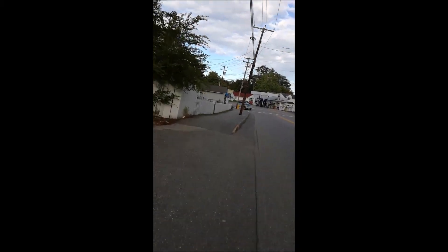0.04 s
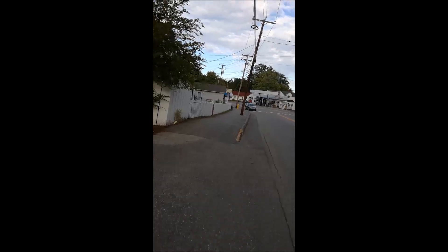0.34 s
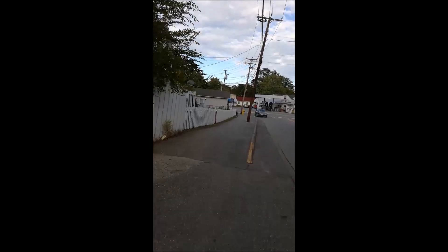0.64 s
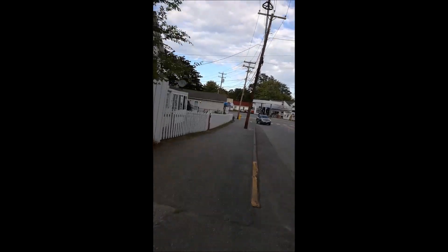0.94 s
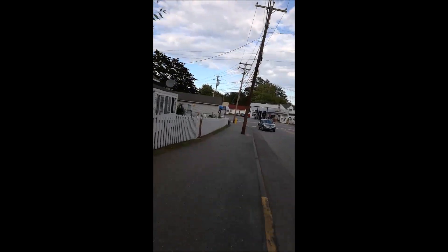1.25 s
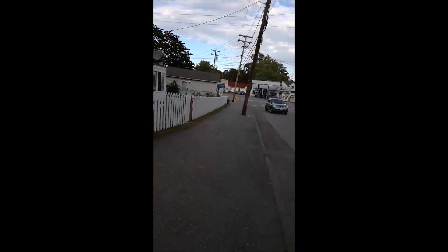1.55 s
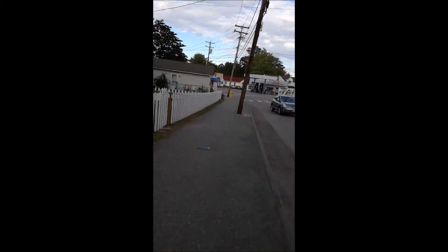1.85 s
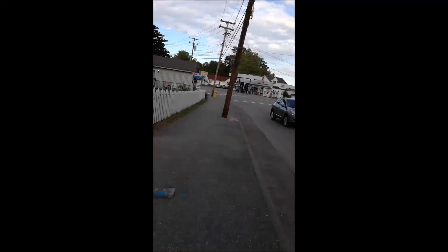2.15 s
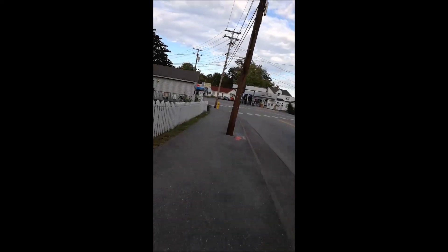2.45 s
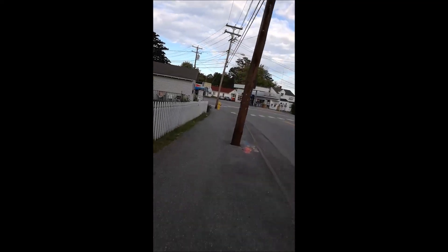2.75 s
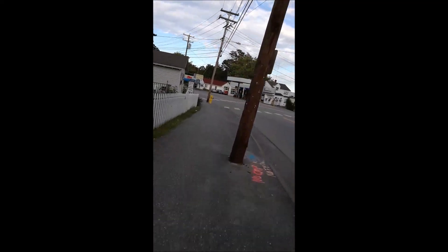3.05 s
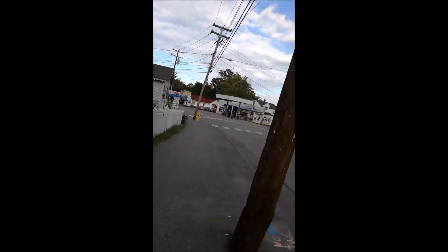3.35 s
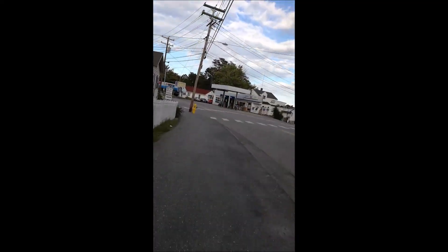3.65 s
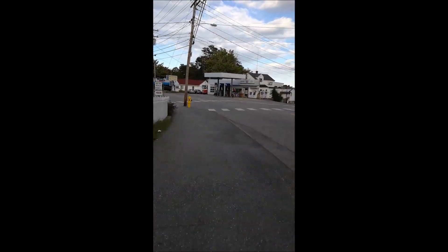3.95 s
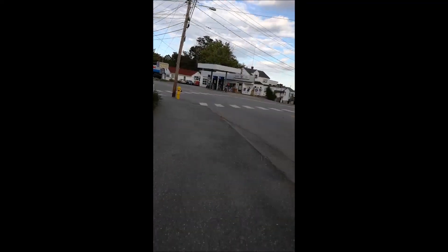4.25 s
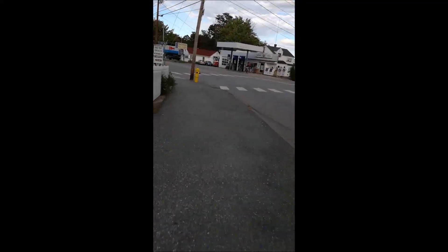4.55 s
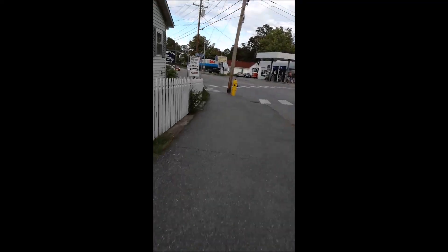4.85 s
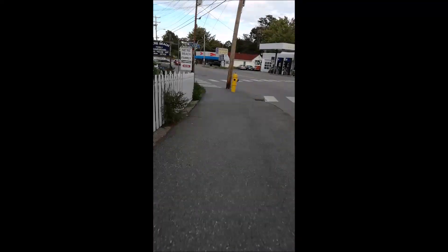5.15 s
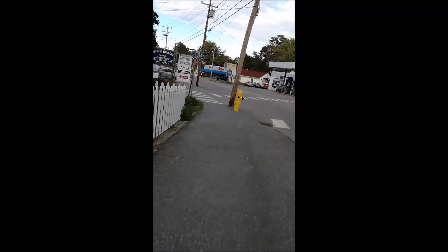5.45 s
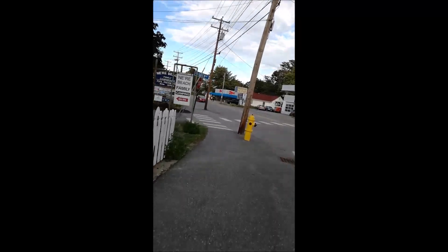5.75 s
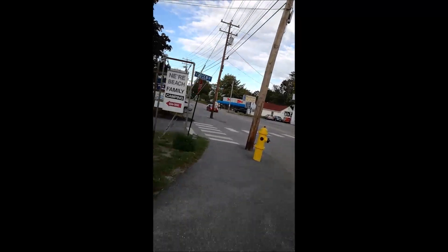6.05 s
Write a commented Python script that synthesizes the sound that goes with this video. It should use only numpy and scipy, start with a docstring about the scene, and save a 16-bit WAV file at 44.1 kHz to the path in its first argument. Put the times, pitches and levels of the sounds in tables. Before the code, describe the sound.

Heard from a moving skateboard on a roadside path, low wind rumble on the microphone sits under the grainy roar of wheels and a shaking deck. Pavement seams knock and tiny stones tick. A car's tyres rush by on the right, then the board slides briefly, scraping and chattering with a falling squeal. The wheels grip and keep rolling with a few more knocks as distant traffic grows faintly.

```python
"""An asphalt path, heard from a rolling skateboard. Grit drums on the wheels and shakes the deck;
the wheels thud over seams, crunch sand and flick small stones. A car passes on the right, then the
wheels slide sideways with a rasp and a falling stick-slip squeal. Wind rumbles at the two microphone
ports, and tyre noise from a junction ahead grows at the end."""
import sys
import numpy as np
from scipy import signal
from scipy.fft import rfft, irfft
from scipy.io import wavfile
from scipy.ndimage import uniform_filter1d

SR = 44100
rng = np.random.default_rng(int(sys.argv[2]) if len(sys.argv) > 2 else 0)


def store_pcm(level_fs):
    """Save levels as 16-bit WAV."""
    pcm = np.round(np.clip(level_fs, -1, 1) * 32767).astype(np.int16)
    wavfile.write(sys.argv[1], SR, np.atleast_2d(pcm).T)


N = 273420
TIME, HZ = np.arange(N) / SR, np.fft.rfftfreq(N, 1 / SR)
SLIDE_S, GRIP_S, ROLLING_S = 3.48, 4.137, 4.222  # wheels break loose, start to grip, roll again

# Rolling noise: time_s, level_db, tilt_db_per_oct, ring_db, hollow_db
ROLL_CURVE = [(0, -60, 1, -54, -57), (.3, -59, 1, -55.5, -55), (.53, -53, -1.5, -56, -64),
              (1, -56.5, -0.2, -57, -50), (1.45, -53, -1, -57, -51), (4.25, -52, -0.5, -58, -71),
              (4.47, -55.5, -1.5, -62, -67), (4.62, -52, -1, -61, -73), (5.5, -51, -1.9, -59, -58),
              (6.2, -50, -2, -71, -70)]
# Tread spectrum: freq_hz, density_db
TREAD_SPECTRUM = [(200, -9), (700, 2.5), (1300, -7.5), (2000, -4.5), (2900, -5.5), (3500, -11),
                  (5000, -11.5), (6300, -13.5), (8000, -18), (9500, -21.5), (11500, -25.5), (14500, -23.5),
                  (16000, -31)]
# Broad wheel resonances: freq_hz, width_hz, lift_db
WHEEL_RESONANCES = [(1650, 230, 5), (4380, 500, 4.5), (7200, 790, 3)]
# Board-to-port paths: freq_hz, coherence, left_lead_rad, left_over_right_db
BOARD_STEREO = [(700, 0.95, 1.44, 20), (1190, 0.41, 1.5, 0), (1800, 0.15, 4.5, 6), (2390, 0.92, 4.8, -5),
                (3240, 0.32, 7.95, -3), (4150, 0.24, 8.4, -2.5), (5400, 0.48, 13.2, -11.5),
                (7330, 0.52, 18, -7.5), (9060, .25, 22.3, -11), (10900, .15, 27.2, -2.5),
                (14100, .15, 19, 7)]

def wheels(ring_hz=2386, ring_rise_hz_per_s=30, hollow_hz=1666, wobble_db=0.95):
    """Asphalt grain drums on wheels and trucks: broad modes, and two that sing out."""
    level_db, tilt, ring_db, hollow_db = over_time(ROLL_CURVE)
    modes_db = sum(db / (1 + (2 * (HZ - hz) / width) ** 2) for hz, width, db in WHEEL_RESONANCES)
    grain = grit(per_s=2300, spread_db=2.5, hiss=1.46)
    roll = at_ports(grain, over_freq(TREAD_SPECTRUM)[0] + modes_db, BOARD_STEREO)
    ring = wheel_mode(ring_hz + ring_rise_hz_per_s * TIME, ring_db, width_hz=260, left_db=-2)
    hollow = wheel_mode(hollow_hz, hollow_db, width_hz=240, left_db=5)
    roll = tilted(roll, tilt, pivot_hz=2450) * gain(level_db)
    return (roll + ring + hollow) * gain(wobble_db * flutter(25))


def wheel_mode(hz, level_db, width_hz, left_db, wander=.02, swell_db=1.5):
    """A wheel mode drifts in pitch and strength with the load."""
    drift, strength = flutter(6), flutter(9)
    ring = resonance(hz * (1 + wander * drift), width_hz)
    return ring * gain(level_db + swell_db * strength) * pan(left_db)


# Rough patches, and dips as the wheels go light: centre_s, length_s, rumble_lift_db, roar_lift_db
SHAKE_CHANGES = [(0.258, 0.11, -8, -6), (0.367, 0.094, 5, 2.5), (0.961, 0.04, 8.5, 2.5),
                 (1.4, .04, -1, 4.5), (1.862, 0.082, 6.5, 3), (2.165, 0.18, 7, 3), (2.629, 0.038, 7.5, 2.5),
                 (2.791, 0.059, 10, 4), (3.278, 0.18, 8, 3), (3.484, 0.05, -7, -11), (3.578, 0.096, 8, 2.5),
                 (4.83, 0.078, -1.5, 1.5), (4.98, 0.073, 3, 4.5)]

def shake_lifts_db():
    """Rough patches swell the rumble and roar; both dip briefly when the wheels go light."""
    return sum(np.outer([low, high], swell(s, length)) for s, length, low, high in SHAKE_CHANGES)


# Asphalt coarseness: time_s, rumble_gain_db, roar_gain_db
SURFACE_CURVE = [(0, -26.5, -26), (.55, -24, -27), (.8, -28.5, -27.5), (1.25, -26.5, -27),
                 (1.6, -28, -29.5), (2, -30, -32), (2.7, -28.5, -28), (3.05, -29.5, -28.5),
                 (3.75, -32.5, -28.5), (4.15, -24, -25.5), (4.33, -28, -31.5), (4.55, -24, -29),
                 (4.83, -22, -26), (5.17, -25.5, -30), (5.4, -24, -26.5), (5.8, -29.5, -33.5),
                 (6.2, -31.5, -29.5)]
# Deck and wind spectrum: freq_hz, density_db
RUMBLE_SPECTRUM = [(15, -37), (30, -10), (60, -4), (90, 4.5), (150, 2.5), (250, -0.5), (380, -7.5),
                   (580, -8.5), (800, -13.5), (1100, -21.5), (1600, -31.5), (2500, -44), (5000, -77),
                   (16000, -78)]
# Rumble-to-port paths: freq_hz, coherence, left_lead_rad, left_over_right_db
RUMBLE_STEREO = [(40, .95, .1, .3), (85, .88, .25, .4), (130, .76, .45, .7), (230, .55, 1.25, 1.2),
                 (350, .6, 2, 1.4), (580, .9, 2.8, 3), (850, .78, 3.3, 7.3), (1300, .4, 4, 9),
                 (2200, .3, 4.5, 8)]

def deck(rumble_trim_db=-0.8, roar_trim_db=-1.8, jolt_db=1.5, uneven_db=1.2, edge_growth=0.47):
    """Coarse asphalt shakes the deck, louder and brighter on rough patches."""
    shake = at_ports(noise(), over_freq(RUMBLE_SPECTRUM)[0], RUMBLE_STEREO)
    rumble_db, roar_db = over_time(SURFACE_CURVE) + shake_lifts_db() + uneven_db * flutter(12.8)
    jolts = gain(jolt_db * flutter(65))
    rumble = steadied(band(shake, 130, 380) * jolts, span_s=.1)
    body, edge = split(band(shake, 380, 16000), 900)
    edge = edge * gain(edge_growth * (roar_db - roar_db.mean()) - .5)
    roar = steadied(body * jolts + edge, span_s=.08)
    return rumble * gain(rumble_db + rumble_trim_db) + roar * gain(roar_db + roar_trim_db)


# Seams: start_s, length_s, knock_db, left_over_right_db, tilt_db_per_oct, thump_db
SEAMS = [(.297, .016, -37, 0, -3, -21), (.319, .018, -20, 0, .5, -16), (.349, .025, -26.5, 0, .5, -17),
         (.386, .014, -26, 0, 3, -28), (.403, .035, -26.5, 0, 1, -17), (.448, .018, -26.5, 0, 1, -24),
         (.607, .016, -30, 0, 3, -30), (1.362, .018, -23, 3, 0, -19), (1.848, .018, -31, 0, -4, -21),
         (2.195, .012, -28, 0, -2, -25), (2.792, .025, -22, 0, 0, -26), (4.641, .018, -25, 2, 0, -21),
         (4.951, .012, -25, 1, 1, -23), (4.98, .015, -29, 1, 1, -25), (5.142, .008, -24.5, 4, 3, -31),
         (5.228, .018, -29, 3, 1, -23), (5.555, .0055, -17, -4, 2, -11)]

def bumps(knock_hz=780, knock_width_oct=.55, knock_lift_db=6, low_cut_hz=130, thump_hz=112):
    """An axle drops over a seam: a jolt, a damped woody knock, a thump as the deck flexes."""
    colour_db = over_freq(RUMBLE_SPECTRUM)[0] + octaves_from(1)  # +1 dB per octave
    colour_db -= 10 * np.log10(1 + (low_cut_hz / (HZ + 1)) ** 4)
    colour_db += knock_lift_db / (1 + (octaves_from(knock_hz) / knock_width_oct) ** 4)
    blows, jolts = np.zeros((2, N)), np.zeros((2, N))
    tilt, thumps = np.zeros(N), np.zeros(N)
    for start_s, length_s, knock_db, left_db, db_per_oct, thump_db in SEAMS:
        age_s = np.maximum(TIME - start_s, 0)
        size = gain(knock_db) * pan(left_db)
        blows += size * np.minimum(age_s / 0.0018, 1) * np.exp(-(age_s / length_s) ** 2)
        contact = age_s / 0.0015
        jolts += size * contact * (2 - contact) * np.exp(-contact)
        flex = (1 - np.exp(-contact)) * np.exp(-age_s / (0.75 * length_s))
        thumps += gain(thump_db) * np.sin(2 * np.pi * thump_hz * age_s) * flex
        tilt[TIME > start_s - .01] = db_per_oct
    knocks = blows * at_ports(noise(), colour_db, RUMBLE_STEREO)
    return tilted(knocks + jolts, tilt, pivot_hz=470) + thumps


# Sideways bites: start_s, length_s, force_db, chatter_db
SLIDE_BITES = [(3.489, 0.013, -38, -46), (3.621, 0.09, -41, -43.5), (3.82, 0.13, -40, -49),
               (3.99, .025, -41, -52), (4.046, .025, -41, -42), (4.126, 0.04, -38, -47),
               (4.192, 0.023, -42, -50)]
# Scrape spectrum: freq_hz, density_db
RASP_SPECTRUM = [(300, -4), (800, 5.5), (1400, 4), (1900, 4.5), (2400, 1), (3100, 1), (3900, -4.5),
                 (5300, -7.5), (7000, -15), (9000, -21), (11000, -28), (15000, -25), (16000, -30)]
# Wheel chatter: freq_hz, width_hz, gain_db
CHATTER_BANDS = [(2830, 650, -0.5), (3570, 870, 0)]
# Slide-to-port paths: freq_hz, coherence, left_lead_rad, left_over_right_db
SLIDE_STEREO = [(850, 0.59, 3.3, 16), (1210, 0.52, 2.9, 6), (1570, 0.27, 2.2, -8), (2400, 0.17, 4.9, -1.5),
                (4220, 0.46, 9, -6.5), (5400, 0.7, 12.2, -13), (8500, 0.67, 21, -9), (11000, .15, 26, 0),
                (14000, .15, 34, 8)]

def slide(skim_db=-43.5, fizz_db=-20, grip_fizz_db=12, sag_hz_per_s=500, judder_db=0.5):
    """Wheels tear over asphalt in tiny slips, chatter as they bite and fizz as they grip."""
    slips = grit(per_s=2600, spread_db=1.2, hiss=.7)
    scrape = at_ports(slips, over_freq(RASP_SPECTRUM)[0], SLIDE_STEREO)
    scrape = contact_patches(scrape, depth_db=2.2)
    force_db, shudder = skim_db, 0
    for start_s, length_s, bite_db, chatter_db in SLIDE_BITES:
        bite = gate(start_s, start_s + length_s, fade_s=0.015)
        force_db += (bite_db - skim_db) * bite
        shudder += gain(chatter_db) * bite
    fine_db = force_db + fizz_db + grip_fizz_db * swell(ROLLING_S, 0.122)
    rasp, fizz = split(scrape, 10700)
    rasp *= gain(force_db - 1) / band_rms(scrape, 2470, 8000)
    fizz *= gain(fine_db) / band_rms(scrape, 9200, 15700)
    sag_hz = sag_hz_per_s * (TIME - SLIDE_S)  # the board slows
    modes = sum(gain(db) * resonance(hz - sag_hz, width) for hz, width, db in CHATTER_BANDS)
    chatter = modes * shudder * pan(-3)
    unload_db = -4.5 * swell(3.752, 0.034)  # wheels go light between two bites
    load = gain(judder_db * flutter(54) + unload_db)
    return (rasp + fizz + chatter) * load * gate(SLIDE_S, ROLLING_S, fade_s=0.025)


def contact_patches(pair, depth_db):
    """Contact patches catch and let go, briefly lifting changing bands."""
    spectra = signal.stft(pair, SR, nperseg=256)[2]
    patches = uniform_filter1d(rng.standard_normal(spectra.shape[1:]), size=3, axis=0)
    patches = uniform_filter1d(patches, size=5, axis=1)
    return signal.istft(spectra * gain(depth_db * unit_rms(patches)), SR, nperseg=256)[1][:, :N]


# Harder stick-slip catches: centre_s, length_s, lift_db, roughness_share
SQUEAL_CATCHES = [(3.773, 0.016, 9, .75), (3.828, 0.036, 6.5, .4), (3.94, .008, 15, .2), (4.1, .05, 8, .1),
                  (4.181, .018, 9, .6), (4.206, 0.024, 12.5, .65)]

def squeal(start_s=3.765, pitch_hz=2398, sag_hz_per_s=220, dive_hz_per_s=15500,
           base_db=-43, base_rough=0.57, waver=.026, bend=.02, left_lead_rad=4.67):
    """Stick-slip locks onto a wheel mode; the pitch sags, then dives as the wheels grip."""
    hz = pitch_hz - sag_hz_per_s * (TIME - start_s) - dive_hz_per_s * np.maximum(TIME - GRIP_S, 0)
    level_db, rough = base_db, base_rough
    for centre_s, length_s, lift_db, roughness in SQUEAL_CATCHES:
        catch = swell(centre_s, length_s)
        level_db += lift_db * catch
        rough += (roughness - base_rough) * catch
    rough = np.clip(rough, 0, 1)
    unsteady_hz = hz * (1 + waver * flutter(119.7) + bend * flutter(19.95))
    phase = 2 * np.pi * np.cumsum(unsteady_hz) / SR
    tone = np.sqrt(2) * np.cos([phase + left_lead_rad, phase])
    torn = np.sqrt(1 - rough ** 2) * resonance(hz, width_hz=380) + rough * resonance(hz, width_hz=1000)
    voice = np.sqrt(1 - rough) * tone + np.sqrt(rough) * torn
    return voice * gain(level_db) * pan(-6) * gate(start_s, ROLLING_S, fade_s=0.0067)


# Flicked stones: start_s, gain_db, tilt_db_per_oct
STONE_FLICKS = [(.53, -49, 7), (.589, -50, 11), (0.611, -43, 2), (.677, -52, 9), (.779, -47, 6),
                (1.371, -42, 6), (1.417, -34, -2), (1.454, -39, 7), (1.4752, -25.5, 1.5), (1.541, -45, 10),
                (1.693, -46, 11), (1.785, -45, -3), (1.881, -44, 20), (1.892, -51, 8), (2.084, -42, 8),
                (2.255, -40, -2), (2.31, -45, 7), (2.594, -42, 0), (4.829, -49, 8), (4.987, -39, 1),
                (5.082, -47, 8), (5.092, -42, -4), (5.155, -50, 9), (5.577, -52, 8), (6.167, -52, 9)]
# Stone and sand spectrum: freq_hz, density_db
CLICK_SPECTRUM = [(800, -36.5), (2500, 4.5), (4500, 1), (7500, 0), (11000, -9.5), (14500, -3), (16000, -10)]

def stones(click_s=0.0017, rebound_s=0.0026, rebound_db=-6, rattle_db=-17, t60_s=.04, trim_db=-9):
    """Each stone ticks, rebounds at once and leaves a faint rattle."""
    ticks, tilt = np.zeros(N), np.zeros(N)
    for start_s, db, db_per_oct in STONE_FLICKS:
        age_s = np.maximum(TIME - start_s, 0)
        contacts = np.array([age_s, np.maximum(age_s - rebound_s, 0)]) / click_s
        hit, rebound = 2 * contacts * np.exp(-contacts ** 2)
        rattle = (age_s > 0) * gain(rattle_db - 60 * np.minimum(age_s / t60_s, 2))
        ticks += gain(db + trim_db) * (hit + gain(rebound_db) * rebound + rattle)
        tilt[TIME > start_s - .01] = db_per_oct
    crack = at_ports(noise(), over_freq(CLICK_SPECTRUM)[0], BOARD_STEREO)
    return tilted(ticks * crack, tilt, pivot_hz=8100)


# Pebble strike and rebound: start_s, gain_db
PEBBLE_STRIKES = [(.6138, -30.5), (.617, -34.5)]
# Struck deck modes: freq_hz, gain_db, t60_s
DECK_MODES = [(1507, -7, .014), (2320, -5, .016), (3930, -14, .012), (7260, -16, .01)]

def pebble():
    """A larger pebble snaps against the deck, which rings briefly."""
    ring = np.zeros(N)
    for start_s, hit_db in PEBBLE_STRIKES:
        age_s = np.maximum(TIME - start_s, 0)
        for hz, mode_db, t60_s in DECK_MODES:
            decay_db = -60 * np.minimum(age_s / t60_s, 3)
            ring += gain(hit_db + mode_db + decay_db) * np.sin(2 * np.pi * hz * age_s)
    return np.array([ring, ring])


# Wheel scuffs: start_s, length_s, level_db, tilt_db_per_oct
SAND_SCUFFS = [(0.603, 0.015, -49.5, -1), (1.356, 0.022, -45, -3), (1.41, 0.044, -50.5, 4),
               (1.49, 0.048, -46, -0.5), (1.715, 0.025, -54, 1), (1.755, .02, -49.5, 2),
               (4.56, 0.033, -59, 6.5)]

def scuffs(colour_db_per_oct=-6.56):
    """Wheels crunch over loose sand; finer sand is brighter."""
    press = sum(gain(db) * gate(s, s + length, fade_s=0.017) for s, length, db, _ in SAND_SCUFFS)
    tilt = over_time([(s + length / 2, slope) for s, length, _, slope in SAND_SCUFFS])[0]
    sand = grit(per_s=5000, spread_db=3, hiss=.5)
    colour_db = over_freq(CLICK_SPECTRUM)[0] + colour_db_per_oct * octaves_from(1)
    return tilted(press * at_ports(sand, colour_db, BOARD_STEREO), tilt, pivot_hz=3100)


# Loose sand: time_s, level_db
SAND_CURVE = [(0, -78), (.4, -72), (.65, -72), (.9, -82), (1.3, -68), (1.5, -62), (1.62, -74), (1.77, -68),
              (2, -74), (2.3, -70), (3, -77), (4.5, -86), (4.7, -73), (5.15, -68), (5.7, -73), (6.2, -75)]

def crackle(colour_db_per_oct=9, clump_db=2):
    """Sand grains burst under the wheels in clumps, more where the path is dirty."""
    grains = grit(per_s=900, spread_db=1, hiss=0) * gain(clump_db * flutter(40))
    colour_db = over_freq(CLICK_SPECTRUM)[0] + colour_db_per_oct * octaves_from(1)
    return at_ports(grains, colour_db, BOARD_STEREO) * gain(over_time(SAND_CURVE)[0])


def bearing(centre_s=5.56, length_s=.24, pitch_hz=4530, sag_hz_per_s=400, level_db=-63):
    """A dry bearing sings faintly, sinking in pitch."""
    hz = pitch_hz - sag_hz_per_s * (TIME - centre_s)
    return resonance(hz, width_hz=70) * gain(level_db) * swell(centre_s, length_s)


# Airflow over the ports: time_s, gain_db
AIRFLOW_CURVE = [(0, -26), (.65, -32), (1.2, -28), (1.6, -34), (1.9, -32), (2.4, -34), (2.9, -29.5),
                 (3.75, -32.5), (4.8, -29.5), (5.3, -30.5), (5.6, -30.5), (6.2, -36)]
# Gusts: centre_s, length_s, strength_db
WIND_GUSTS = [(0.143, 0.092, 1.5), (.43, 0.093, 6.5), (0.807, 0.044, 6), (1.2, .25, 1), (1.868, 0.18, 4),
              (2.128, 0.1, 4.5), (3.215, 0.1, 3), (3.41, 0.055, 2)]

def wind(gust_db=-8.5, gust_growth=2.1, buffet_growth=0.17, shake_share=0.47, eddy_db=3.5):
    """Eddies press on both ports; the low band follows gusts, the upper also the board's shaking."""
    air = at_ports(noise(), over_freq(RUMBLE_SPECTRUM)[0], RUMBLE_STEREO)
    strength_db = sum(db * swell(s, length) for s, length, db in WIND_GUSTS)
    low_db = gust_db + gust_growth * strength_db + eddy_db * flutter(15)
    upper_db = buffet_growth * strength_db + shake_share * shake_lifts_db()[0] + 0.55 * flutter(8.7)
    gusts = steadied(band(air, 15, 60.7), span_s=.2) * gain(low_db)
    buffets = steadied(band(air, 63.6, 141), span_s=.14) * gain(upper_db)
    return (gusts + buffets) * gain(over_time(AIRFLOW_CURVE)[0])


# Car tyre spectrum: freq_hz, density_db
TYRE_SPECTRUM = [(100, -12), (400, 2), (800, 0), (1100, 3.5), (1800, 0), (2400, -9), (3200, -14.5),
                 (4500, -21), (7300, -31), (9500, -41.5), (12000, -44), (16000, -50)]
# Car-to-port paths: freq_hz, coherence, left_lead_rad, left_over_right_db
CAR_STEREO = [(300, 0.34, -0.81, 2), (1000, 0.94, -0.44, -5.5), (1620, 0.78, -0.42, 3.5),
              (2070, 0.49, -0.53, 1.5), (2590, 0.14, -0.58, -8.5), (4000, 0.27, -0.74, -10),
              (7500, .1, -1.2, -23.5), (14000, .1, 0, -4)]

def car(pass_s=2.617, speed_m_per_s=13.3, nearest_m=8.1, level_db=-35, swing_db=4,
        hiss_db=-54, hiss_hz=6200, hiss_width_oct=0.33):
    """Tyre roar swells, brightens, swings right and fades behind; the tread hisses alongside."""
    along = speed_m_per_s * (TIME - pass_s) / nearest_m
    distance_ratio = np.hypot(1, along)
    ahead = along < 0
    nearness = distance_ratio ** -np.where(ahead, 1.6, 2.1)
    tilt = 0.75 - 1.5 * ahead * np.log2(distance_ratio)
    tyres = at_ports(noise(), over_freq(TYRE_SPECTRUM)[0], CAR_STEREO)
    roar = tilted(tyres, tilt, pivot_hz=1000) * nearness * gain(level_db)
    hiss_colour_db = -20 * np.log10(1 + (octaves_from(hiss_hz) / hiss_width_oct) ** 2)
    hiss = at_ports(noise(), hiss_colour_db, BOARD_STEREO) * gain(hiss_db) * swell(2.53, 0.11)
    return roar * pan(-swing_db * along / distance_ratio) + hiss


# Traffic ahead: time_s, level_db
JUNCTION_CURVE = [(0, -69), (5.2, -73), (5.6, -56), (6.2, -52)]

def junction(centre_hz=1650, half_width_oct=0.25):
    """Far tyres make a dull band of noise that grows as the crossing nears."""
    colour_db = -10 * np.log10(1 + (octaves_from(centre_hz) / half_width_oct) ** 6)
    return at_ports(noise(), colour_db, BOARD_STEREO) * gain(over_time(JUNCTION_CURVE)[0])


def gain(db):
    """Decibels to amplitude."""
    return 10 ** (np.asarray(db) / 20)


def pan(left_db):
    """Channel gains, left_db apart."""
    return gain(np.vstack([left_db / 2, -left_db / 2]))


def unit_rms(x):
    """Scales to rms 1."""
    return x / np.sqrt(np.mean(x ** 2) + 1e-20)


def octaves_from(hz):
    """Frequency axis in octaves above hz."""
    return np.log2((HZ + 1) / hz)


def over_freq(rows):
    """Table columns over log frequency."""
    hz, *columns = np.transpose(rows)
    return [np.interp(np.log(HZ + 1), np.log(hz + 1), column) for column in columns]


def over_time(rows):
    """Table columns over time."""
    time_s, *columns = np.transpose(rows)
    return [np.interp(TIME, time_s, column) for column in columns]


def gate(start_s, end_s, fade_s):
    """One from start to end, ramps outside."""
    return np.clip(np.minimum(TIME - start_s, end_s - TIME) / fade_s + 1, 0, 1)


def swell(centre_s, length_s):
    """Bell curve of peak 1, length_s wide at half height."""
    return 2 ** -(2 * (TIME - centre_s) / length_s) ** 2


def noise():
    """Two unrelated white noises."""
    return rng.standard_normal((2, N))


def flutter(top_hz):
    """Smooth random motion, rms 1."""
    return unit_rms(irfft(rfft(rng.standard_normal(N)) / (1 + (HZ / top_hz) ** 4), N))


def grit(per_s, spread_db, hiss):
    """Tiny impacts of uneven size over a smooth hiss."""
    sizes = gain(spread_db * np.minimum(rng.exponential(1, N), 5))
    hits = rng.random(N) < per_s / SR
    return unit_rms(sizes * hits * noise()) + hiss * noise()


def resonance(hz, width_hz):
    """Two unrelated voices of a noise-driven mode, rms 1; hz may move."""
    smear = np.array([flutter(width_hz / 2) + 1j * flutter(width_hz / 2) for _ in range(2)])
    return (smear * np.exp(2j * np.pi * np.cumsum(hz * np.ones(N)) / SR)).real


def band(pair, low_hz, high_hz):
    """Soft-edged band, rms 1."""
    edges = 1 / np.sqrt((1 + (HZ / high_hz) ** 12) * (1 + (low_hz / (HZ + 1)) ** 12))
    return unit_rms(irfft(rfft(pair) * edges, N))


def band_rms(pair, low_hz, high_hz):
    """Level of a pair's centre within a band."""
    return irfft(rfft(pair.mean(0)) * ((HZ > low_hz) & (HZ < high_hz)), N).std() + 1e-12


def split(x, hz):
    """Parts below and above hz."""
    low = irfft(rfft(x) / (1 + (HZ / hz) ** 6), N)
    return low, x - low


def steadied(pair, span_s):
    """Evens out slow swells, keeps the fast grain."""
    power = uniform_filter1d((pair ** 2).mean(0), size=int(span_s * SR))
    return pair / np.sqrt(np.abs(power) + 1e-9)


def tilted(pair, db_per_oct, pivot_hz):
    """Time-varying slope, from one octave below the pivot to two above."""
    hz, frame_s, spectra = signal.stft(pair, SR, nperseg=512)
    octaves = np.clip(np.log2((hz + 1) / pivot_hz), -1, 2)[:, None]
    tilt_db = octaves * np.interp(frame_s, TIME, db_per_oct)
    return signal.istft(spectra * gain(tilt_db), SR, nperseg=512)[1][:, :N]


def at_ports(drives, colour_db, paths):
    """Colours two unrelated drives and blends them into a stereo pair with centre rms 1."""
    coherence, lead_rad, left_db = over_freq(paths)
    shared, separate = rfft(drives) * gain(colour_db)
    left = shared * gain(left_db)
    right = (coherence * shared + np.sqrt(1 - coherence ** 2) * separate) * np.exp(-1j * lead_rad)
    pair = irfft(np.array([left, right]) / np.sqrt(1 + gain(left_db) ** 2), N)
    return pair / pair.mean(0).std()


def scene():
    """Board, wind and traffic in open air."""
    rolling = deck() + bumps() + wheels() + bearing() + scuffs() + stones() + pebble() + crackle()
    return rolling + slide() + squeal() + wind() + car() + junction()


def record(dry):
    """Steep low-pass at the top of the treble."""
    lowpass = signal.firwin(511, cutoff=15850, window=("kaiser", 9), fs=SR)
    return signal.oaconvolve(dry, lowpass[None], "same")


dry = scene()
out = record(dry)
store_pcm(out)
```